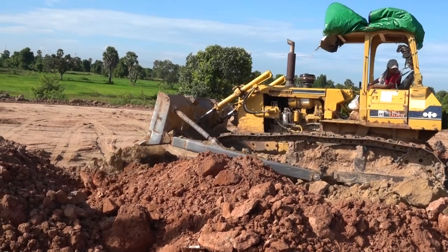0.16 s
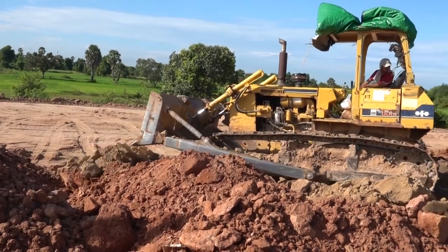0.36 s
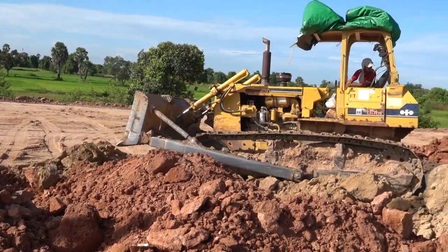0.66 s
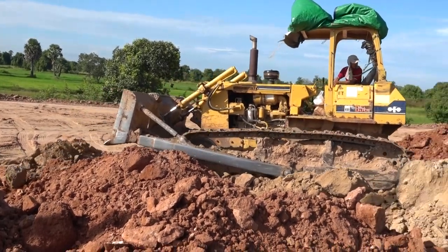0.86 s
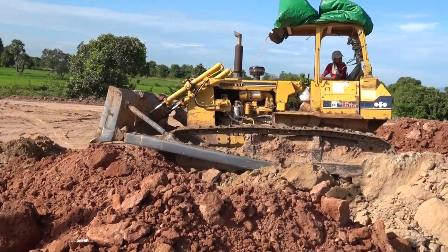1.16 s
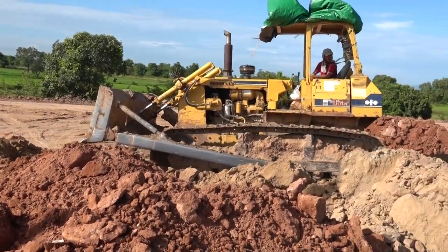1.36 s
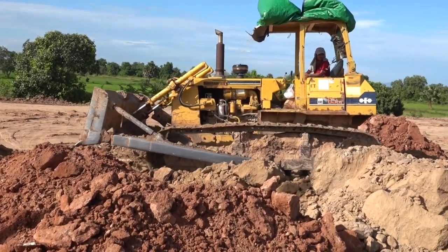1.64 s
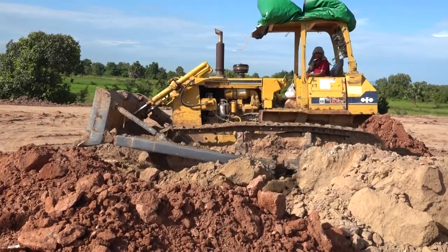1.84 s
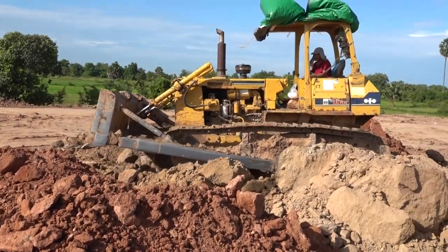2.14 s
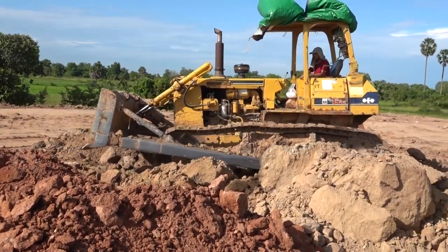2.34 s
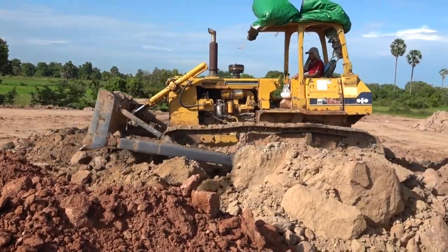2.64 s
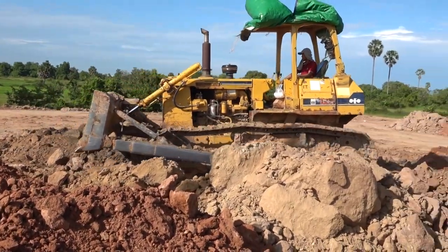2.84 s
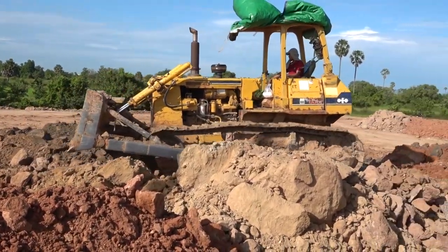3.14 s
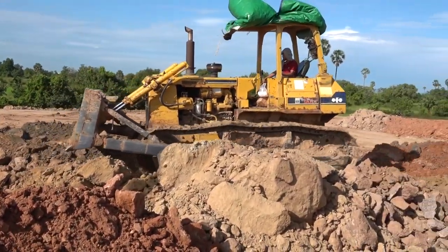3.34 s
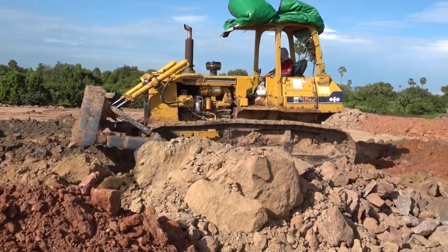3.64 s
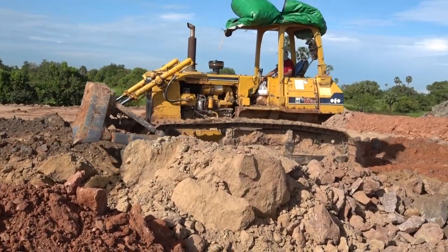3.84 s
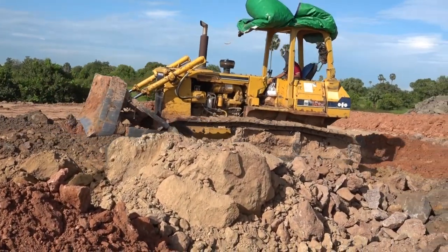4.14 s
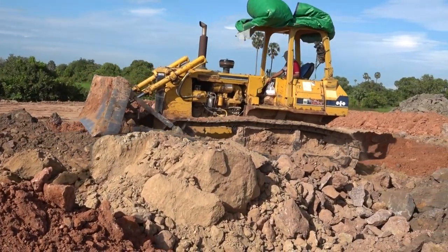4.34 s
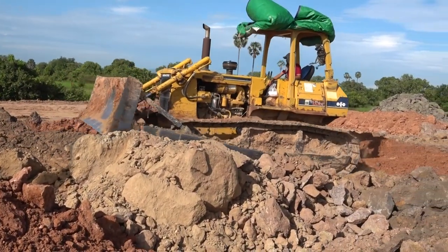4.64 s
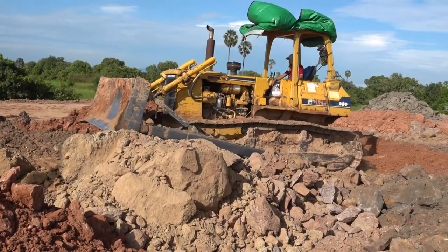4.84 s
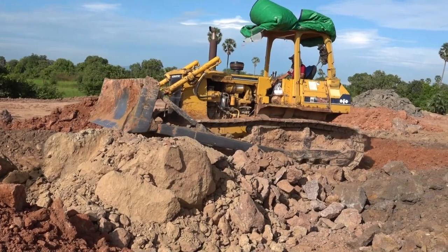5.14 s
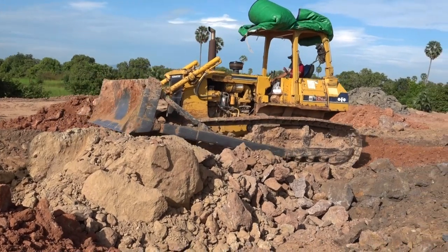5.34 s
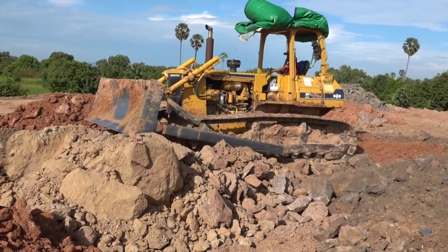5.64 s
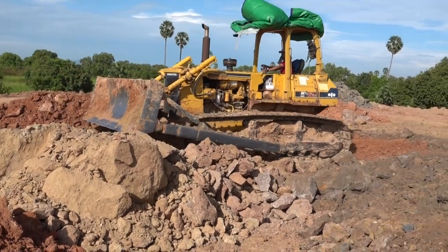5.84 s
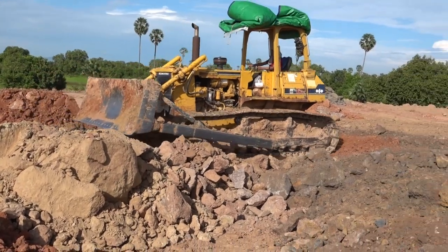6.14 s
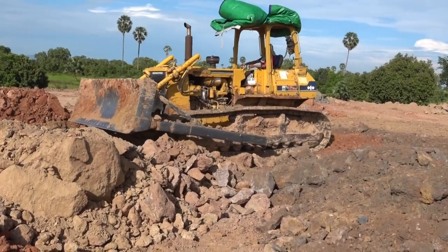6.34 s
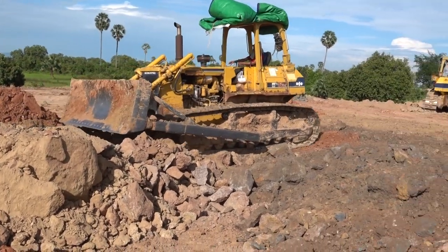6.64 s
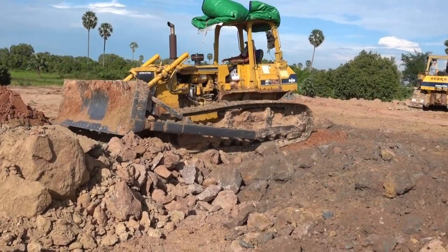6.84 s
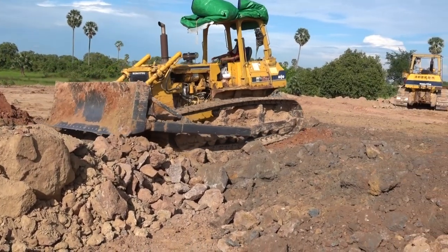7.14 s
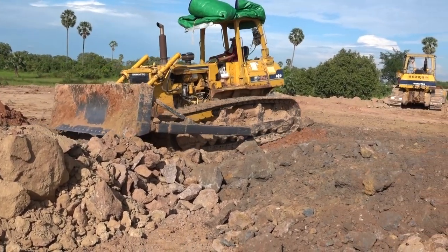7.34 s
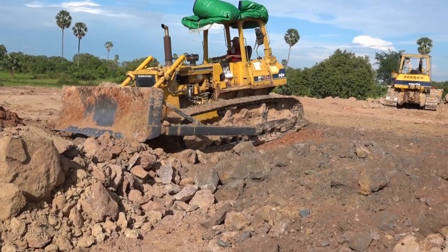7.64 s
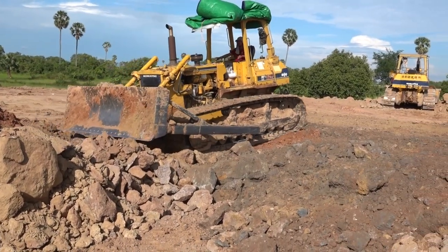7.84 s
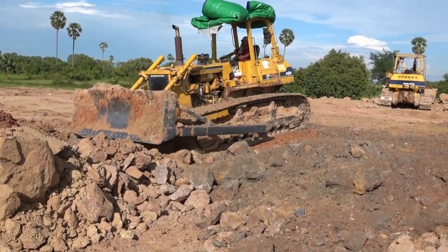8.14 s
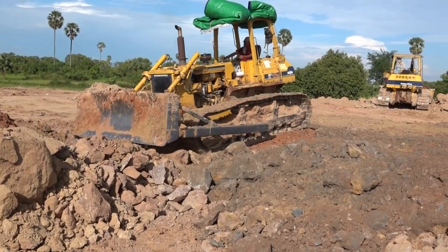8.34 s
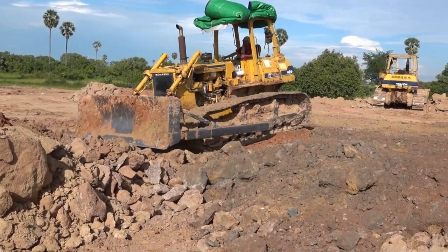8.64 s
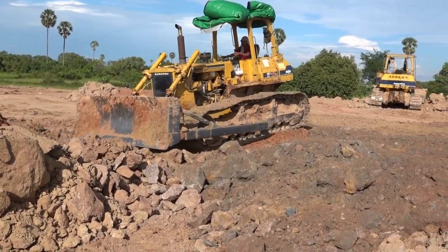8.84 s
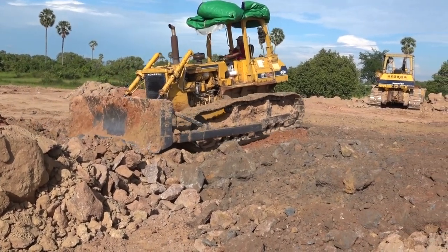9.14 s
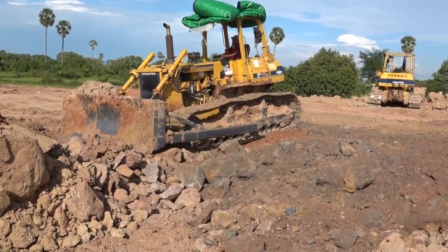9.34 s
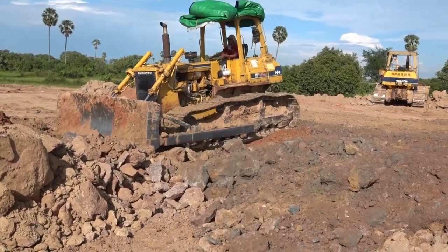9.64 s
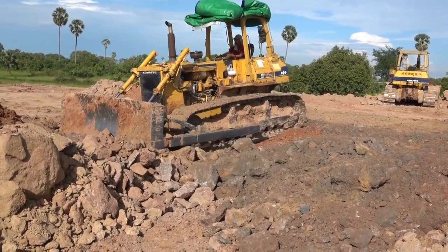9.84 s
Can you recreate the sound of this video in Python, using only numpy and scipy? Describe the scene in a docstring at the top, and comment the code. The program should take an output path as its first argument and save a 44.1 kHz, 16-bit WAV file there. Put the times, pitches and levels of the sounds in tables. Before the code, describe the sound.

A bulldozer's diesel engine drones and clatters without a break on open ground, heard from nearby with no echo. Its steel tracks grind through grit over a low rumble of soil. Brief squeaks and metal groans come and go, and stones crack against the steel early on and again past the middle, along with a few clinks of track links. Near the end the engine picks up speed.

```python
"""Bulldozer pushing rock and soil

A crawler works on open ground, passing side-on and then turning its blade forward. Its six-cylinder
diesel drones from the stack while the block clatters once per firing and the gears whine faintly.
The tracks grind grit, groan, squeak and clink, and stones crack and scrape on the steel over a bed
of rumbling soil. A limiter holds the peaks."""
import sys
import numpy as np
from scipy import signal
from scipy.fft import rfft, irfft
from scipy.io import wavfile
from scipy.ndimage import uniform_filter1d, minimum_filter1d

SR = 44100
rng = np.random.default_rng(int(sys.argv[2]) if len(sys.argv) > 2 else 0)


def persist_wave(psi):
    """Save psi, clipped to +-1, as 16-bit WAV."""
    counts = np.round(np.clip(psi, -1, 1) * 32767).astype(np.int16)
    wavfile.write(sys.argv[1], SR, np.atleast_2d(counts).T)


N = 440118
TIME = np.arange(N) / SR
FREQ = np.maximum(np.arange(N // 2 + 1) * SR / N, 1)
CYLINDERS = 6

# Soil rumbling under the hull. Each row: frequency in Hz, relative level in dB.
RUMBLE_EQ = [(12, -24), (25, -12), (45, -1), (110, 0), (150, -4.5), (220, -11), (330, -20)]
# Sand in the tracks, from the side and the front. Each row: frequency in Hz, relative level in dB.
GRIT_SIDE_EQ = [(2300, -19.5), (3200, 0.5), (3800, -2.5), (4500, -1), (5300, -2.5), (6900, -2.5),
                (7800, -6.5), (8800, -12.5), (10300, -14), (11500, -19), (13500, -21.5), (15500, -31)]
GRIT_FRONT_EQ = [(2300, -15.5), (3200, 1), (4400, 2.5), (5000, -2), (5700, 2), (7200, -1), (8300, -6),
                 (10200, -7.5), (11400, -16), (13500, -22), (15500, -26.5)]
# The loudest pin squeals. Each row: centre and half length in seconds, pitch in Hz, relative level in dB.
PIN_SQUEALS = [(0.036, .05, 7950, -48), (1.25, 0.059, 7850, -56), (1.54, .05, 3875, -53),
               (1.81, 0.032, 3850, -49), (2.127, .055, 3840, -54), (2.196, .04, 3882, -50),
               (2.25, 0.033, 3891, -54), (2.94, .04, 3370, -51), (4.155, .06, 3903, -53),
               (4.207, .035, 3893, -44), (4.26, .025, 3898, -51), (7.067, .09, 7910, -62),
               (8.75, .05, 7907, -62), (8.83, .057, 12200, -65)]
# Blade and track frame groaning under load.
# Each row: centre and half length in seconds, pitch in Hz, glide in Hz per second, level in dB.
FRAME_GROANS = [(.26, 0.21, 415, 151, -31), (1.47, 0.13, 990, 0, -32.5), (1.83, 0.17, 509.3, 3, -29),
                (2.3, .24, 503, -12, -28), (2.92, .2, 445.6, -55, -28), (4.18, .2, 600, -2, -29.5),
                (5.58, 0.194, 506, 7, -26), (5.73, .13, 509, 0, -25), (7.02, 0.36, 619.3, -370, -35),
                (8.22, .16, 558, 0, -34.5), (8.95, .22, 1016, 2, -36)]
# Track links knocking together. Each row: start in seconds, level in dB, pitch in Hz, decay in seconds.
LINK_HITS = [(5.84, -37, 2723, 0.012), (6.069, -45, 2742, 0.013), (7.085, -48, 3000, 0.026),
             (7.352, -55, 5340, .045), (8.785, -53, 5560, .07)]
# Stones breaking on steel. Each row: start in seconds, relative level in dB, ring in Hz, decay in seconds.
STONE_HITS = [(1.32, -53, 8600, .03), (1.432, -41, 7750, .026), (1.436, -42, 5500, .032),
              (1.467, -45, 3350, .035), (1.5, -44.5, 7800, .03), (1.58, -51, 12200, .03),
              (1.605, -49, 5350, .035), (2.894, -52, 6750, .02), (3.135, -52, 8600, .055),
              (5.813, -52, 9000, .012), (5.839, -50, 8550, .022), (6.068, -49, 6800, .014),
              (6.189, -43, 10900, .012), (6.213, -50, 8750, .03), (6.452, -54, 8600, .025),
              (7.07, -51, 5660, .04), (7.83, -56, 7000, .025), (8.78, -49, 6100, .055)]
# The crunch of a breaking stone. Each row: frequency in Hz, relative level in dB.
CRUNCH_EQ = [(1500, -13.5), (2800, 10), (5600, 2), (8000, 3.5), (10500, -9), (13000, -11.5), (15500, -23)]
# The ring of a track shoe. Each row: mode frequency in Hz, relative level in dB.
SHOE_MODES = [(2720, -0.5), (3350, 4), (5300, -6.5), (5650, 4.5), (6750, 3), (7750, -2), (8600, -8.5),
              (10100, -11.5), (12400, -9.5), (14200, -9.5)]
# Valve train and timing gears. Each row: multiple of the firing rate, relative level in dB.
GEAR_WHINES = [(3.5, -10), (5, -13.5), (6, -20.5), (6.5, -18.5), (7.5, -15.5), (9.5, -14), (11.5, -12),
               (12.5, -17), (13.1, -13), (16.85, -17), (22.33, -24)]
# The engine bay behind the soil heap, open from the side, and behind the blade.
# Each row: frequency in Hz, relative level in dB.
BAY_HEAP_EQ = [(120, -32), (200, -1), (209, -4.5), (298, -0.5), (334, -4.5), (410, -1.5), (539, -6),
               (701, -3.5), (860, -5.5), (1040, -8), (1180, -7), (1440, -12.5), (1890, -24), (2510, -26),
               (3050, -31), (3960, -56), (6710, -120)]
BAY_SIDE_EQ = [(120, -32.5), (200, -3), (243, -1.5), (334, -0.5), (401, -4), (434, -1), (498, -1),
               (577, -4.5), (987, -8), (1250, -15), (1470, -12.5), (1810, -19.5), (2050, -18.5),
               (2220, -25), (3050, -32.5), (3960, -52), (6710, -120)]
BAY_BLADE_EQ = [(120, -28.5), (200, -18.5), (227, -10.5), (288, -6.5), (334, 1.5), (392, -5), (424, -6),
                (492, -4), (640, -9), (742, -14.5), (998, -16.5), (1130, -20.5), (1230, -20.5), (1720, -29),
                (3050, -44.5), (3960, -60), (6710, -120)]
# Fader for the block's clatter; rumble, grit and gears follow. Each row: time in seconds, level in dB.
CLATTER_FADER = [(0, -30), (1.25, -30), (1.6, -28.5), (2.1, -30), (2.85, -29), (3.3, -27.5), (3.9, -29.5),
                 (4.28, -27), (5.05, -30), (5.6, -27.5), (6.5, -30.5), (6.8, -33), (7.1, -32), (7.5, -33.5),
                 (8.35, -33), (8.88, -31), (9.35, -32.5), (9.98, -29.5)]
# Engine speed, sagging under load and picking up as the blade empties.
# Each row: time in seconds, firing rate in Hz.
FIRING_RATE = [(0, 75.43), (1.1, 84.7), (1.92, 89.2), (2.45, 84.5), (3.95, 85), (4.3, 87.4), (4.62, 91.64),
               (4.85, 90.13), (5.15, 86.24), (6.2, 84), (6.85, 87.68), (7.6, 83.33), (8.25, 82.32),
               (8.78, 95.1), (9.03, 96.76), (9.29, 91.57), (9.75, 101.6), (9.98, 103.5)]
# The lope of unequal cylinders. Each row: cycles per two shaft turns, level in dB.
LOPE_TONES = [(2, -44), (3, -32), (4, -38), (5, -44), (7, -45), (8, -41), (9, -50), (10, -48)]
# Faders for the exhaust drone and its octave, which is strong while the stack is seen from the side.
# Each row: time in seconds, level in dB.
DRONE_FADER = [(0.05, -8.5), (0.43, -11), (1.5, -12.5), (1.83, -11), (2.24, -15.5), (2.57, -13),
               (3.97, -14.5), (4.08, -13), (4.6, -12.5), (5.18, -16), (5.29, -14), (5.78, -11),
               (6.25, -10.5), (6.55, -9.5), (6.83, -11), (7.04, -10), (9.24, -9.5), (9.9, -11.5)]
OCTAVE_FADER = [(0, -29.5), (.75, -22), (1.25, -20), (1.9, -20.5), (2.2, -27.5), (2.55, -20), (2.85, -25.5),
                (4.35, -24), (4.7, -31.5), (5.1, -45.5), (5.6, -34.5), (6.5, -38.5), (7.05, -46),
                (7.85, -29), (8.4, -37.5), (8.8, -32.5), (9.55, -30), (9.98, -41)]


def undb(db):
    """Decibels to gain."""
    return 10 ** (np.asarray(db) / 20)


def unit(x):
    """Scale to rms 1."""
    return x / np.sqrt(np.mean(x ** 2))


def automation(points):
    """Draw straight ramps through (seconds, value) points."""
    return np.interp(TIME, *np.transpose(points))


def equalise(x, points):
    """Shape a sound with an EQ curve of (Hz, dB) points that rolls off beyond its ends; rms 1."""
    hz, db = np.transpose(points)
    skirts = np.minimum(1, np.minimum(FREQ / hz[0], hz[-1] / FREQ)) ** 4
    return unit(irfft(rfft(x) * skirts * undb(np.interp(np.log(FREQ), np.log(hz), db)), N))


def band(x, low_hz, high_hz):
    """One soft-edged band of a sound; rms 1."""
    gain = 1 / (1 + (low_hz / FREQ) ** 10) / (1 + (FREQ / high_hz) ** 10)
    return unit(irfft(rfft(x) * gain, N))


def drift(rate):
    """Smooth random modulation, changing about rate times a second; rms 1."""
    size = 32768
    hz = np.arange(size // 2 + 1) * SR / N
    slow = irfft(rfft(rng.standard_normal(size)) * np.exp(-(hz / rate) ** 2))
    return np.interp(np.arange(N) * size / N, np.arange(size), unit(slow))


def crossfade(sounds, fades_s):
    """Move from one view of the machine to the next; fades_s holds the start and end of each fade."""
    view = np.interp(TIME, fades_s, np.arange(1, len(fades_s) + 1) // 2)
    return sum(np.maximum(1 - np.abs(view - k), 0) * x for k, x in enumerate(sounds))


def track_in_view(hidden_s=2, fade_s=.25):
    """Falls from 1 to 0 as a heap screens the near track."""
    return .5 - .5 * np.tanh((TIME - hidden_s) / fade_s)


def machine_levels(clatter_db, side_on_s=3.55, half_pass_s=.81):
    """Body, rattle and grit swell with the clatter; the open engine side and bare track add brightness."""
    swell_db = clatter_db + 30  # above the usual clatter
    open_side = 1 / (1 + ((TIME - side_on_s) / half_pass_s) ** 6)
    body_db = -26 + .78 * swell_db
    rattle_db = -43 + 1.02 * swell_db + 5.5 * open_side
    grit_db = -53.5 + .87 * swell_db + 2.5 * open_side + 4.5 * track_in_view()
    return body_db, rattle_db, grit_db


def ground(body_db, trim_db=-5):
    """The low bed: soil and hull rumble as the machine works."""
    return equalise(rng.standard_normal(N), RUMBLE_EQ) * undb(body_db + trim_db)


def pin_chirps(low_hz=3975, high_hz=7920, threshold=.38, blur=.9):
    """Dry pins catch and let go in faint chirps; the low ones carry only while the track is in view."""
    def chirps(hz):
        caught = np.clip(drift(9) - threshold, 0, 1)
        return caught * np.sqrt(2) * np.sin(2 * np.pi * hz * TIME + blur * drift(45))
    return undb(-57) * track_in_view() * chirps(low_hz) + undb(-67) * chirps(high_hz)


def stick_slip(rows, waver, chatter_db):
    """Steel sticks and slips: unsteady tones swell and die away. Rows are laid out as in FRAME_GROANS."""
    wobble, grip, out = drift(84), undb(chatter_db * drift(60)), np.zeros(N)
    for centre, half_length, hz, glide, db in rows:
        span = np.abs(TIME - centre) < half_length
        t = TIME[span] - centre
        swell = np.cos(np.pi / 2 * t / half_length) ** 4
        pitch = (hz + glide * t) * (1 + waver * wobble[span])
        phase = 2 * np.pi * np.cumsum(pitch) / SR
        out[span] += undb(db) * np.sqrt(2) * swell * grip[span] * np.sin(phase)
    return out


def pin_squeals(trim_db=1):
    """Now and then a dry pin squeals aloud at a nearly steady pitch."""
    rows = [(centre, half_length, hz, 0, db) for centre, half_length, hz, db in PIN_SQUEALS]
    return undb(trim_db) * stick_slip(rows, waver=.0021, chatter_db=1.5)


def frame_groans():
    """Heavy plates moan under load with a rough, sliding pitch."""
    return stick_slip(FRAME_GROANS, waver=.008, chatter_db=1)


def link_clinks(attack_s=.00088, jangle=.6, crack_db=-5, crack_s=.0056):
    """A link drops on its neighbour with a crack and jangles briefly, damped by soil."""
    crunch, wobble, out = equalise(rng.standard_normal(N), CRUNCH_EQ), drift(200), np.zeros(N)
    for start, db, hz, decay in LINK_HITS:
        span = (TIME > start) & (TIME < start + .5)
        t = TIME[span] - start
        ring = np.sqrt(2) * np.exp(-t / decay) * np.sin(2 * np.pi * hz * t + jangle * wobble[span])
        crack = undb(crack_db) * np.exp(-t / crack_s) * crunch[span]
        out[span] += undb(db) * np.minimum(t / attack_s, 1) * (ring + crack)
    return out


def track_grit(firings, grit_db, grains_per_s=900, spread_db=2, crackle_db=-6, surge_db=.8, throb=.052):
    """Sand crushed under the shoes crackles over the hiss of the machine."""
    grains = (rng.random(N) < grains_per_s / SR) * rng.standard_normal(N)
    grains *= undb(spread_db * np.minimum(rng.exponential(size=N), 4))
    tick = rng.standard_normal(SR // 50) * np.exp(-TIME[:SR // 50] / .001)
    crackle = unit(signal.fftconvolve(grains, tick)[:N])
    hiss = rng.standard_normal(N) * (1 + throb * np.cos(2 * np.pi * firings))
    sand = hiss + undb(crackle_db) * crackle
    views = [equalise(sand, eq) for eq in (GRIT_SIDE_EQ, GRIT_FRONT_EQ)]
    return crossfade(views, fades_s=(3.8, 6.7)) * undb(grit_db + surge_db * drift(20))


def stone_cracks(crunch_db=1, ping_db=-6, shoe_db=-9.5, blur_hz=200, ragged_db=9.5):
    """A stone gives way in a ragged crunch with a blurred ping, and the track shoe rings with it."""
    crunch = unit(equalise(rng.standard_normal(N), CRUNCH_EQ) * undb(ragged_db * drift(340)))
    blur = drift(blur_hz) + 1j * drift(blur_hz)
    shoe = unit(sum(undb(db) * drift(60) * np.sin(2 * np.pi * hz * TIME) for hz, db in SHOE_MODES))
    out = np.zeros(N)
    for start, db, hz, decay in STONE_HITS:
        span = (TIME > start) & (TIME < start + .5)
        t = TIME[span] - start
        attack = .11 * decay  # long crunches start slowly
        envelope = np.minimum(t / attack, 1) * np.exp(-np.maximum(t - attack, 0) / decay)
        ping = np.real(blur[span] * np.exp(2j * np.pi * hz * t))
        layers = undb(crunch_db) * crunch[span] + undb(ping_db) * ping + undb(shoe_db) * shoe[span]
        out[span] += undb(db) * envelope * layers
    return out


def gear_whine(firings, clatter_db, trim_db=-3.5, fade_db=3, backlash=.52):
    """Faint whines ride the engine speed; backlash blurs them and they come and go."""
    tones = sum(undb(db + fade_db * drift(2.2)) * np.sin(2 * np.pi * k * firings + backlash * drift(12))
                for k, db in GEAR_WHINES)
    return np.sqrt(2) * tones * undb(clatter_db + trim_db)


def block_knocks(firings, decay_s=.055, scatter_db=1.5):
    """Each cylinder strikes the block at its own place, so its own dense ring returns every two turns."""
    starts = np.flatnonzero(np.diff(np.floor(firings)) > 0)
    t = TIME[:SR // 4]
    rings = rng.standard_normal((CYLINDERS, len(t))) * np.exp(-t / decay_s)
    strengths = undb(scatter_db * rng.standard_normal(N))
    out = 0
    for cylinder, ring in enumerate(rings):
        blows, own_starts = np.zeros(N), starts[cylinder::CYLINDERS]
        blows[own_starts] = strengths[own_starts]
        out += signal.fftconvolve(blows, ring)[:N]
    return unit(out)


def engine_bay(firings, body_db, clatter_db, rattle_db, rush_db=2.5, throb=.19, flutter_db=.76):
    """Knocks and the throbbing rush of gas and fan ring the panels; heap and blade screen them in turn."""
    rush = rng.standard_normal(N) * (1 + throb * np.cos(2 * np.pi * firings))
    drive = block_knocks(firings) + undb(rush_db) * rush
    views = [equalise(drive, eq) for eq in (BAY_HEAP_EQ, BAY_SIDE_EQ, BAY_BLADE_EQ)]
    bands = (197, 613, body_db - .3), (653, 1576, clatter_db - .3), (1571, 3500, rattle_db + .19)
    out = 0
    for low_hz, high_hz, db in bands:
        heard = crossfade([band(view, low_hz, high_hz) for view in views], fades_s=(1.8, 2.8, 6.2, 6.9))
        out += heard * undb(db + flutter_db * drift(25))
    return out


def exhaust(firings, octave_lead_rad=.85):
    """The stack smooths the firings to a drone and its octave; unequal cylinders make it lope."""
    phase = 2 * np.pi * firings
    drone = undb(automation(DRONE_FADER) + .4 * drift(7.6)) * np.cos(phase)
    octave = undb(automation(OCTAVE_FADER) + drift(14)) * np.cos(2 * phase + octave_lead_rad)
    lope = sum(undb(db + 2 * drift(6.8)) * np.cos(cycles * phase / CYLINDERS + rng.uniform(0, 2 * np.pi))
               for cycles, db in LOPE_TONES)
    return np.sqrt(2) * (drone + octave + lope)


def scene():
    """Diesel, tracks, stones and ground in one mono mix: open air, with no walls to echo."""
    firings = np.cumsum(automation(FIRING_RATE)) / SR  # running count: the engine's clock
    clatter_db = automation(CLATTER_FADER)
    body_db, rattle_db, grit_db = machine_levels(clatter_db)
    diesel = exhaust(firings) + engine_bay(firings, body_db, clatter_db, rattle_db)
    diesel += gear_whine(firings, clatter_db)
    crawler = track_grit(firings, grit_db) + pin_chirps() + pin_squeals() + frame_groans() + link_clinks()
    return (diesel + crawler + stone_cracks() + ground(body_db))[None]


def record(dry, ceiling=.65, fade_in_s=.002, top_hz=15500):
    """A fast limiter ducks the highest peaks; the sound fades in at once and the top is cut."""
    window = SR // 100
    needed_gain = np.minimum(1, ceiling / (np.abs(dry) + 1e-9))
    gain = uniform_filter1d(minimum_filter1d(needed_gain, window), window)
    fade_in = np.minimum(1, TIME / fade_in_s)
    high_cut = signal.ellip(8, .2, 70, top_hz, fs=SR, output="sos")
    return signal.sosfilt(high_cut, dry * gain * fade_in)


dry = scene()
out = record(dry)
persist_wave(out)
```